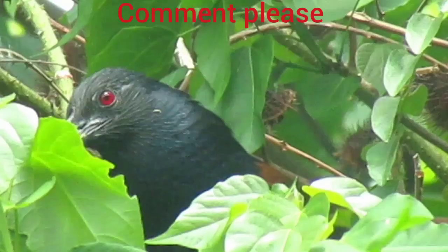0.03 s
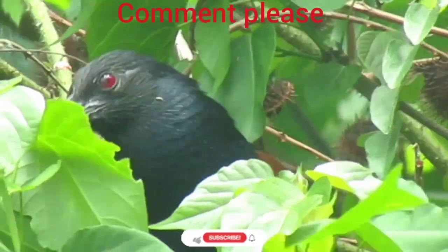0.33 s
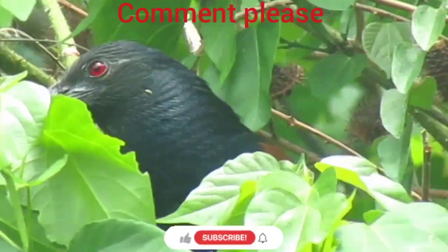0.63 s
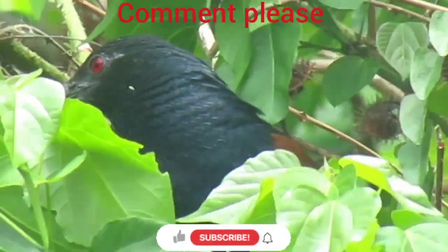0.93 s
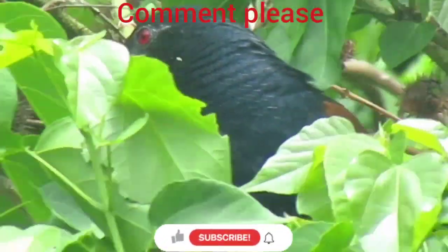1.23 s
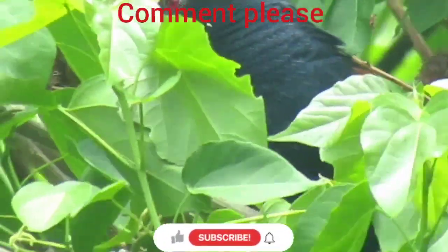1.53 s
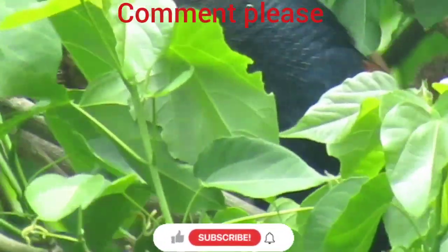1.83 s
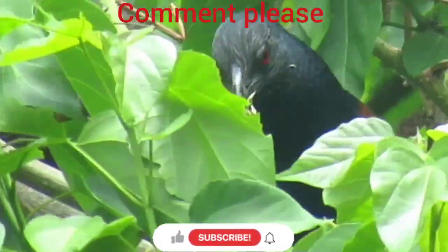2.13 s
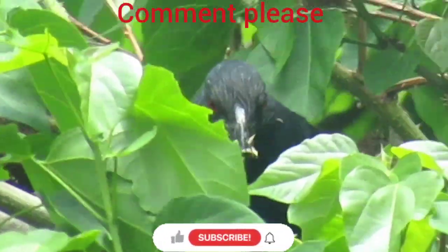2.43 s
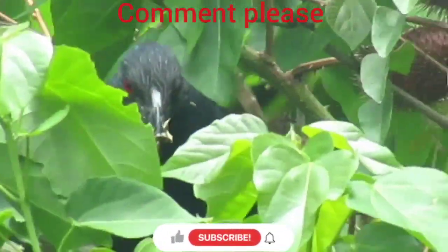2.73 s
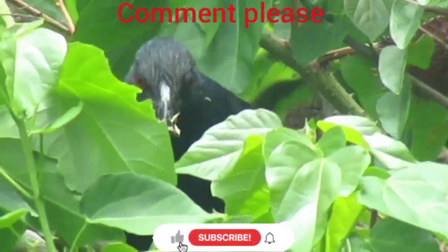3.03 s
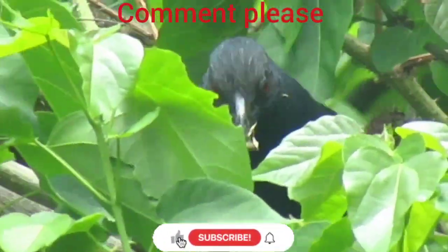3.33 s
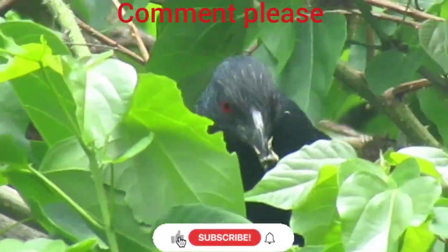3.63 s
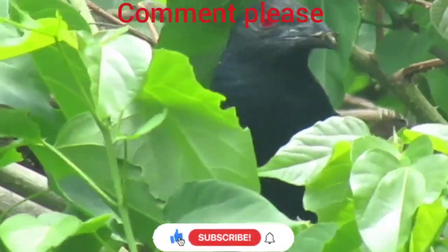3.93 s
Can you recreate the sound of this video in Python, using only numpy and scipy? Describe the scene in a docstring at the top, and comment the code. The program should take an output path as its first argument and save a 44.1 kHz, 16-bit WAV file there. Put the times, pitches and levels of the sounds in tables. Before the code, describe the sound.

A bird gives low, evenly spaced hoots in a forest, and a second joins halfway, overlapping it. Farther off, wavy whistles climb and swell, while small birds chirp high. The microphone picks up steady hiss, light wind and soft bumps.

```python
"""Coucal duet in a forest

One coucal hoots a steady beat; its mate joins in and their near-pure notes throb against each other.
A farther bird swells into a run of wavy whistles, another toots, and small birds call high in the leaves.
Trunks and leaves scatter the voices into echoes. Air buffets the microphone, with a few soft bumps,
over a steady hiss."""
import sys
import numpy as np
from scipy import signal
from scipy.fft import rfft, irfft
from scipy.io import wavfile
from scipy.ndimage import uniform_filter1d

SR = 44100
rng = np.random.default_rng(int(sys.argv[2]) if len(sys.argv) > 2 else 0)


def waveform_to_disk(signal):
    """Save audio, clipped to [-1, 1], as 16-bit WAV at the path in sys.argv[1]."""
    frames = np.transpose(np.atleast_2d(signal))
    scaled = np.clip(frames, -1, 1) * 32767
    samples = np.round(scaled).astype(np.int16)
    wavfile.write(sys.argv[1], SR, samples)


N = 176400


def amp(db):
    """Decibels to gain."""
    return 10 ** (np.asarray(db) / 20)


def unit(x):
    """Scales to rms 1."""
    return x / np.sqrt(np.mean(x ** 2) + 1e-20)


def read(points, hz):
    """Reads a table on a log-frequency axis."""
    f, value = np.transpose(points)
    return np.interp(np.log(hz + 1), np.log(f + 1), value)


def add(mix, start, sound):
    """Mixes a sound in at a start time in seconds."""
    part = mix[max(round(start * SR), 0):][:len(sound)]
    part += sound[:len(part)]


def progress(length):
    """Runs from 0 to 1 over a note."""
    return np.linspace(0, 1, max(int(length * SR), 8))


def edges(u, length, attack_s, release_s):
    """Smooth rise, hold, smooth fall."""
    rise = np.sin(np.pi / 2 * np.minimum(u * length / attack_s, 1))
    fall = np.sin(np.pi / 2 * np.minimum((1 - u) * length / release_s, 1))
    return rise * fall


def tone(hz, octave_db=None):
    """A pure voice of rms 1 on a pitch curve, with an optional faint octave."""
    phase = 2 * np.pi * np.cumsum(hz) / SR
    octave = 0 if octave_db is None else amp(octave_db) * np.sin(2 * phase)
    return np.sqrt(2) * (np.sin(phase) + octave)


def waver(like, size):
    """Random drift of rms 1, smoothed over size samples."""
    return unit(uniform_filter1d(uniform_filter1d(rng.standard_normal(len(like)), size), size))


# Reverb decay of the forest (frequency [Hz], time to fall 60 dB [s])
FOREST_DECAY = [(450, 0.54), (1300, 0.94), (7000, 0.39)]
def forest(x, echo_db):
    """The scatter of trunks and leaves: sparse echoes dying away band by band."""
    onset = np.minimum(np.arange(SR) / SR / 0.0064, 1)
    taps = rng.standard_normal(SR) * (rng.random(SR) < .1) * onset
    hz, t, bands = signal.stft(taps, SR, nperseg=256)
    decay = amp(-60 * t / read(FOREST_DECAY, hz)[:, None])
    tail = signal.istft(bands * decay, SR, nperseg=256)[1]
    return amp(echo_db) * np.std(x) * unit(signal.fftconvolve(x, tail)[:N])


# EQ of the hiss bed (frequency [Hz], relative level [dB])
HISS_EQ = [(15, -46), (25, 0), (71, -18.5), (276, -8.5), (333, -7.5), (435, -8.5), (584, -9.5), (996, -9),
           (1490, -14), (3990, -18), (7180, -23), (7990, -25.5), (8660, -24.5), (11600, -30),
           (14800, -40.5)]
def hiss(level_db=-35.5, patch_db=0.65):
    """An even bed of hiss with faint drifting patches and a narrow gap in the treble."""
    hz = np.fft.rfftfreq(2048, 1 / SR)
    real, imag, patches = rng.standard_normal((N // 512 + 5, len(hz), 3)).T
    patches = unit(uniform_filter1d(uniform_filter1d(patches, size=24, axis=0), size=8, axis=1))
    notch_db = -15 * np.exp(-((hz - 7830) / 84) ** 2)
    colour_db = read(HISS_EQ, hz) + notch_db
    bands = (real + 1j * imag) * amp(colour_db[:, None] + patch_db * patches)
    return amp(level_db) * unit(signal.istft(bands, nperseg=2048, noverlap=1536)[1][:N])


# Fader ride of the buffeting air (time [s], level [dB])
BUFFET_RIDE = [(0.1, -47.5), (0.44, -41), (1.4, -46), (1.44, -38), (1.49, -46.5), (2.39, -38),
               (2.43, -30.5), (2.88, -27), (2.9, -34), (3.84, -41), (3.881, -25), (4.0, -29)]
# EQ of its rumble (frequency [Hz], relative level [dB])
BUFFET_EQ = [(20, -12), (45, -3), (80, 1.5), (115, -2), (190, -5), (300, -13.5), (700, -27), (2000, -70)]
def buffet(lump_db=2.44):
    """Lumpy low rumble of air on the microphone."""
    colour = amp(read(BUFFET_EQ, np.fft.rfftfreq(N, 1 / SR)))
    rumble = irfft(rfft(rng.standard_normal(N)) * colour, N)
    lumps = amp(lump_db * waver(rumble, size=700))
    ride_db = np.interp(np.arange(N) / SR, *np.transpose(BUFFET_RIDE))
    return unit(rumble * lumps) * amp(ride_db)


# Soft bumps on the microphone (start [s], pitch [Hz], envelope peak [dB])
MIC_BUMPS = [(1.432, 119, -27.5), (2.465, 133, -18), (2.579, 150, -21), (2.630, 150, -17),
             (2.680, 140, -20.5), (2.810, 121, -14.5), (2.864, 173, -16), (3.17, 116, -20),
             (3.878, 130, -15), (3.887, 150, -17), (3.902, 170, -16), (3.946, 175, -15),
             (3.991, 190, -15.5)]
def bumps(rise_s=0.0028):
    """Dull knocks that die within two or three cycles."""
    out, t = np.zeros(N), np.arange(SR // 20) / SR
    envelope = t / rise_s * np.exp(1 - t / rise_s)
    for start, hz, db in MIC_BUMPS:
        add(out, start, amp(db) * envelope * np.sin(2 * np.pi * hz * t))
    return out


# Far toots (start [s], length [s], pitch [Hz], level [dB])
FAR_TOOTS = [(2.854, 0.035, 874, -30.5), (2.892, 0.0091, 890, -27), (2.969, 0.05, 876, -27.5),
             (3.10, 0.038, 859.6, -31.5)]
def tooter(sag=0.078):
    """A distant bird drops in a few short toots that sag in pitch."""
    out = np.zeros(N)
    for start, length, hz, db in FAR_TOOTS:
        u = progress(length)
        add(out, start, amp(db) * np.sin(np.pi * u) * tone(hz * (1 - sag * (u - .5))))
    return out + forest(out, echo_db=-9.5)


def falling_calls(rows, swell_db, waver_db=1.5):
    """Thin whistles that swell as they slide down and level off; a bend over 1 lingers at the top."""
    out = np.zeros(N)
    for start, length, top_hz, end_hz, db, bend in rows:
        u, curve = progress(length), bend ** .5
        slide = np.sin(np.pi / 2 * u ** curve) ** curve
        hz = (top_hz + (end_hz - top_hz) * slide) * (1 + 0.0038 * waver(u, size=60))
        level = amp(db - swell_db * (1 - u) ** 2 + waver_db * waver(u, size=200))
        envelope = edges(u, length, attack_s=0.0075, release_s=0.0075)
        add(out, start, level * envelope * tone(hz, octave_db=-33))
    return out


def sweep(length, from_hz, to_hz, db):
    """A glide so quick that it sounds like a tick."""
    u = progress(length)
    return amp(db) * np.sin(np.pi * u) * tone(from_hz + (to_hz - from_hz) * u)


# High calls, near and far (start [s], length [s], top [Hz], end [Hz], full level [dB], bend [ratio])
NEAR_FALLS = [(0.600, 0.066, 7560, 6670, -21.5, 1.1), (0.801, 0.066, 7760, 6540, -21.5, 0.83),
              (2.641, 0.11, 7930, 5360, -34.5, 1.1), (3.889, 0.051, 7410, 6630, -19.5, 1.58)]
FAR_FALLS = [(.03, 0.083, 7530, 6940, -40.5, 1.06), (.21, 0.091, 7710, 7080, -42.5, 1.3),
             (.405, 0.07, 7700, 6620, -39.5, 1.34), (2.225, 0.07, 7892, 6810, -36.5, 0.81),
             (2.403, 0.067, 8100, 6810, -36.5, 0.95), (3.30, 0.13, 7640, 6520, -45, 4.2)]
# Sputters leading into the loud near calls (start [s])
SPUTTER_CUES = [.581, .771, 3.864]
# Upsweeps of one sputter (delay [s], length [s], from [Hz], to [Hz], level [dB])
SPUTTER_SWEEPS = [(.002, 0.0049, 5080, 7150, -33), (.008, 0.0053, 4910, 7760, -27.5),
                  (0.0137, .0105, 5500, 7600, -28)]
# Tiny close chips (start [s], length [s], from [Hz], to [Hz], level [dB])
DRY_CHIPS = [(1.368, 0.0048, 8200, 11300, -35), (1.777, 0.0068, 4360, 4970, -35),
             (3.675, .003, 9200, 7200, -32)]
def small_birds():
    """One bird sputters and calls nearby, others answer from deep in the reverb; the chips stay dry."""
    near = falling_calls(NEAR_FALLS, swell_db=8.5)
    far = falling_calls(FAR_FALLS, swell_db=11.5)
    for start in SPUTTER_CUES:
        for delay, *glide in SPUTTER_SWEEPS:
            add(near, start + delay, sweep(*glide))
    out = near + forest(near, echo_db=-4) + far + forest(far, echo_db=4.5)
    for start, *glide in DRY_CHIPS:
        add(out, start, sweep(*glide))
    return out


# The climbing run (first crest [s], crest pitch [Hz], level before shaping [dB])
WHISTLE_RUN = [(1.275, 1104, -45.5), (1.518, 1240, -40), (1.765, 1306, -36), (2.021, 1370, -34),
               (2.280, 1414, -31.5), (2.555, 1447, -30.5), (2.828, 1485, -31.5), (3.106, 1532, -31),
               (3.385, 1541, -32), (3.661, 1551, -31.5), (3.957, 1573, -32)]
# Contour of each whistle (time from first crest [s], pitch [share of crest], gain [dB])
WHISTLE_CONTOUR = [(-.035, .83, -12.5), (-.014, .96, -3), (.006, 1, 0), (.036, .825, -0.5),
                   (.067, 0.99, -1), (.087, 1, 1), (.115, .85, -0.5), (.158, .68, -7), (0.183, 0.573, -18)]
def whistler(range_hz=(1060, 1470), weak_db_per_hz=0.08, waver_db=2):
    """Two-crested whistles that climb and swell, thinning out at both ends of the bird's range."""
    out = np.zeros(N)
    when, share, shape_db = np.transpose(WHISTLE_CONTOUR)
    t = np.arange(when[0], when[-1], 1 / SR)
    contour = uniform_filter1d(np.interp(t, when, share), size=700)
    for crest, crest_hz, db in WHISTLE_RUN:
        hz = crest_hz * contour * (1 + 0.0066 * waver(t, size=200))
        outside_hz = abs(hz - np.clip(hz, *range_hz))
        loss_db = weak_db_per_hz * outside_hz + waver_db * waver(t, size=700)
        level = amp(db + np.interp(t, when, shape_db) - loss_db)
        add(out, crest + when[0], level * tone(hz))
    echoes = forest(out, echo_db=-3)
    # the ground's reflection swells and thins the whistle as its pitch moves
    add(echoes, 0.003795, amp(-6) * out)
    return out + echoes


# Hoots of both birds (start [s], length [s], opening pitch [Hz], middle pitch [Hz],
# closing pitch [Hz], level before shaping [dB], fade after the opening [dB])
DUET_HOOTS = [(0.065, 0.059, 456, 423, 413, -20.5, 10.5), (0.318, 0.043, 418, 420, 436, -25.5, 0),
              (0.372, 0.072, 401, 397.4, 470, -20.5, -0.5), (0.559, 0.073, 498, 420, 492, -20.5, -1),
              (0.785, 0.081, 497, 420, 455, -20.5, -1), (1.022, 0.088, 496, 407.3, 476, -21.5, -1),
              (1.264, 0.086, 487, 401.6, 468, -20.5, 0.5), (1.509, 0.1, 467, 387.4, 470, -21, 0.5),
              (1.75, 0.1, 476, 386.7, 460, -22.5, 0), (2.001, .1, 462, 384.6, 454, -21.5, 2),
              (2.231, 0.11, 413.5, 417, 383, -22.1, -2), (2.26, 0.11, 461.7, 448, 386, -24.5, -1.5),
              (2.5198, 0.093, 525.6, 453.7, 522, -11, 5.5), (2.5473, 0.096, 518, 379, 475, -21.5, -0.2),
              (2.8233, 0.1, 527, 440, 535, -10, 12), (2.8352, .099, 471, 383.7, 510, -18, 3),
              (3.126, 0.035, 506, 504, 466, -14.5, -1.5), (3.176, 0.03, 444, 428, 445, -11.5, 0),
              (3.2, 0.024, 455, 448, 440, -20, -1), (3.4124, 0.11, 479, 406.2, 426, -21.5, -2.5),
              (3.4531, 0.1, 479.6, 423.5, 449, -23.5, -3.3), (3.698, 0.11, 448.4, 392.5, 473, -21, -1.5),
              (3.7847, 0.1, 488, 406, 477, -21, -.1)]
# The voice flips up as some hoots end (start [s], pitch [Hz], level [dB])
VOICE_FLIPS = [(.630, 546, -30), (.855, 537, -30), (1.099, 529, -33), (1.344, 493.5, -33.5)]
def coucals(throat_hz=414.4, weak_db_per_hz=0.15, jitter=0.0063):
    """Near-pure hoots, most scooping down and up again; the voice weakens below the throat's tuning."""
    out = np.zeros(N)
    middle_at, fade_from, fade_over = 0.533, 0.18, 0.24  # shares of the note
    bend = 1.46  # curvature of the scoop
    for start, length, open_hz, middle_hz, close_hz, db, fade_db in DUET_HOOTS:
        u = progress(length)
        opening = np.sin(np.pi / 2 * np.maximum(1 - u / middle_at, 0) ** bend)
        closing = np.maximum((u - middle_at) / (1 - middle_at), 0) ** bend
        hz = middle_hz + (open_hz - middle_hz) * opening + (close_hz - middle_hz) * closing
        loss_db = fade_db * np.clip((u - fade_from) / fade_over, 0, 1)
        loss_db += weak_db_per_hz * np.maximum(throat_hz - hz, 0)
        level = amp(db - loss_db) * edges(u, length, attack_s=0.024, release_s=0.019)
        voice = tone(hz * (1 + jitter * waver(u, size=100)), octave_db=-48)
        add(out, start, level * voice)
    u = progress(length=0.024)
    for start, hz, db in VOICE_FLIPS:
        add(out, start, amp(db) * np.sin(np.pi * u) * tone(np.full_like(u, hz)))
    return out + forest(out, echo_db=-14)


def scene():
    """All the birds over the hiss and rumble, in mono."""
    return (coucals() + whistler() + tooter() + small_birds() + hiss() + buffet() + bumps())[None]


def record(dry):
    """The sound cuts in after a moment of silence; a steep low-pass trims the top."""
    start_s, cutoff_hz = 0.07, 15000
    live = dry * (np.arange(N) >= start_s * SR)
    lowpass = signal.firwin(511, cutoff_hz, window=("kaiser", 9), fs=SR)
    return signal.oaconvolve(live, lowpass[None], "same")


dry = scene()
out = record(dry)
waveform_to_disk(out)
```